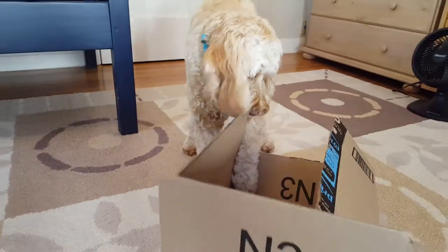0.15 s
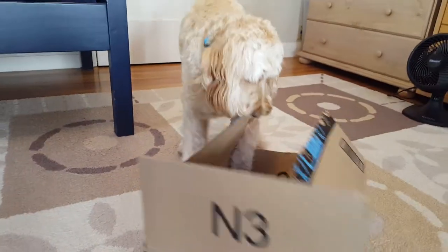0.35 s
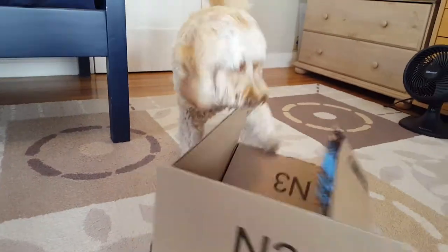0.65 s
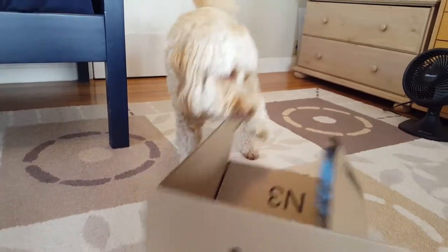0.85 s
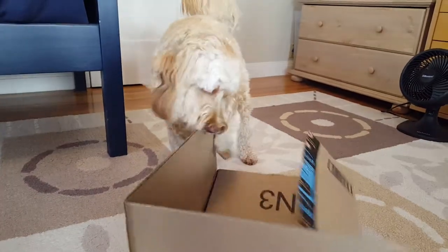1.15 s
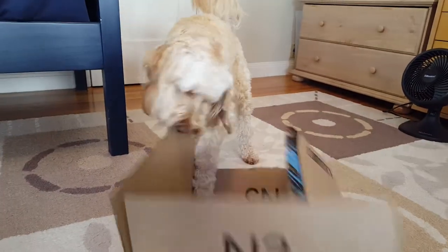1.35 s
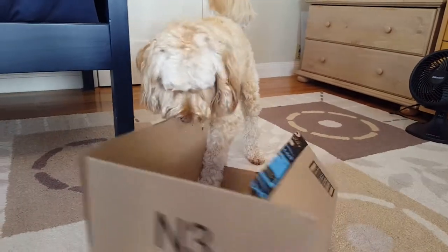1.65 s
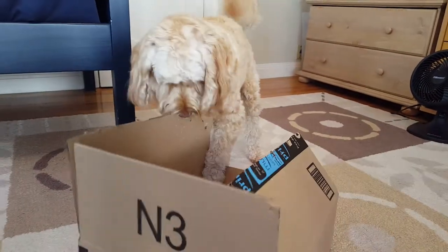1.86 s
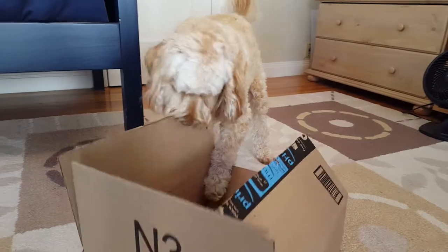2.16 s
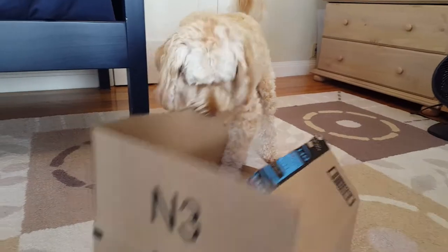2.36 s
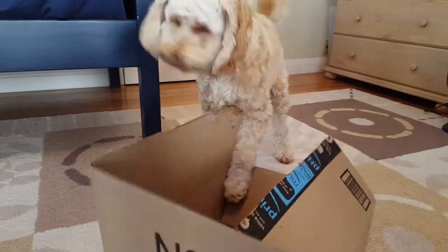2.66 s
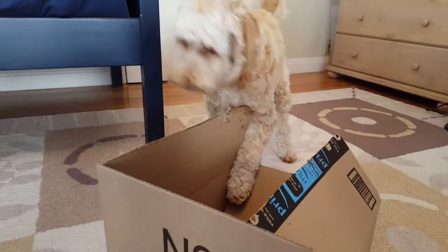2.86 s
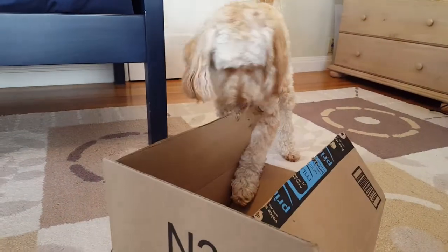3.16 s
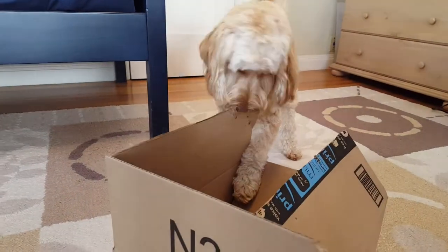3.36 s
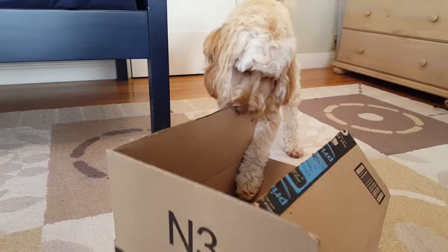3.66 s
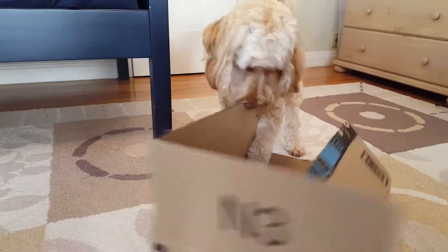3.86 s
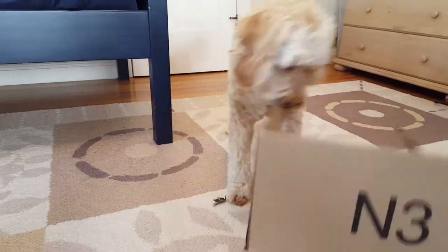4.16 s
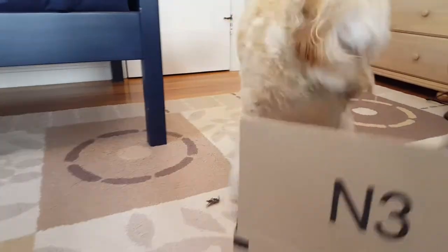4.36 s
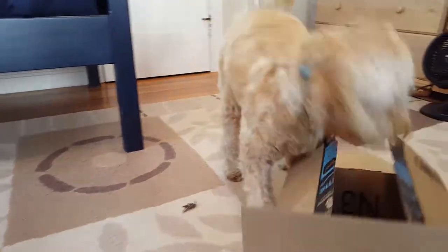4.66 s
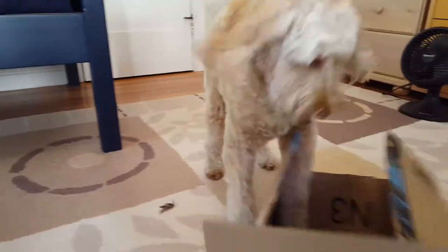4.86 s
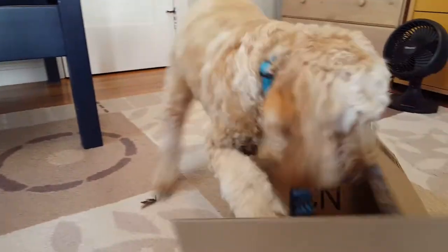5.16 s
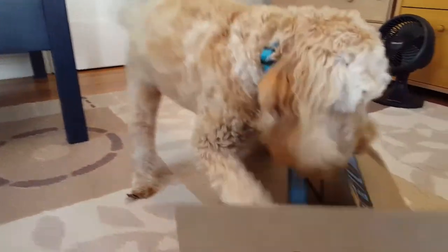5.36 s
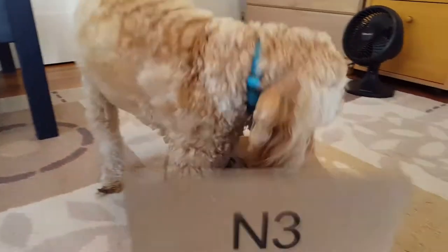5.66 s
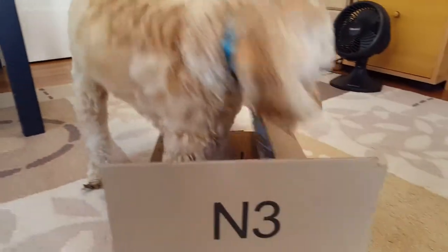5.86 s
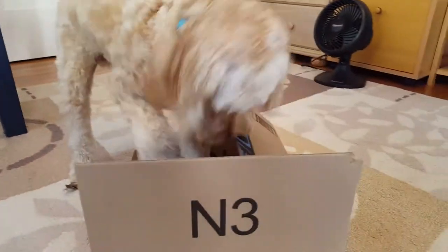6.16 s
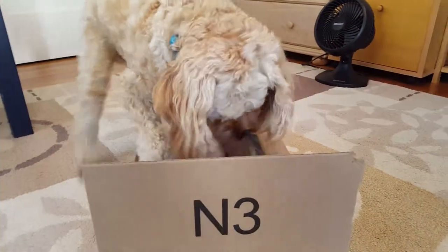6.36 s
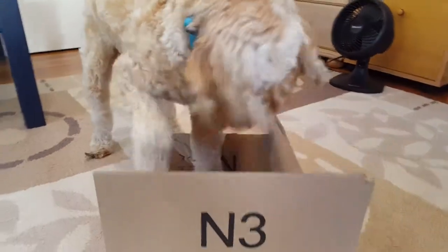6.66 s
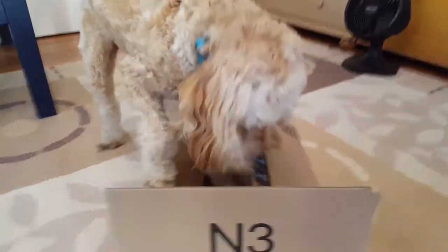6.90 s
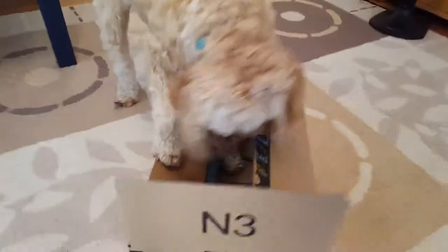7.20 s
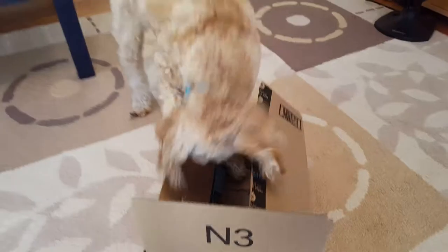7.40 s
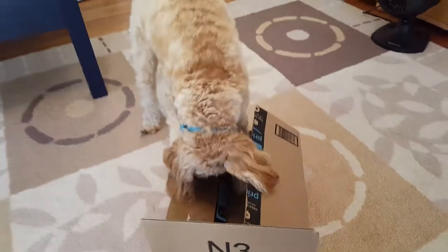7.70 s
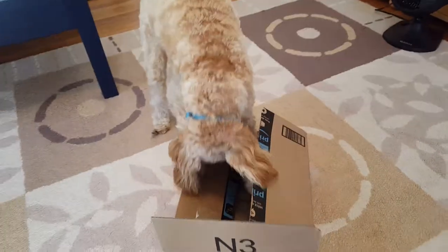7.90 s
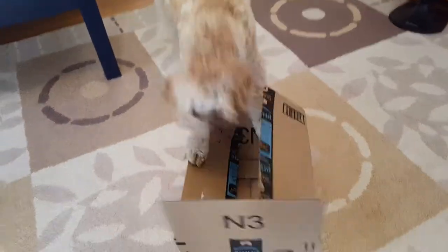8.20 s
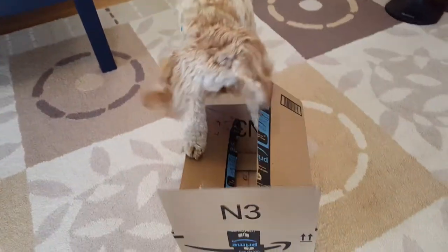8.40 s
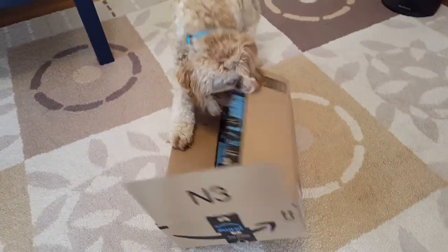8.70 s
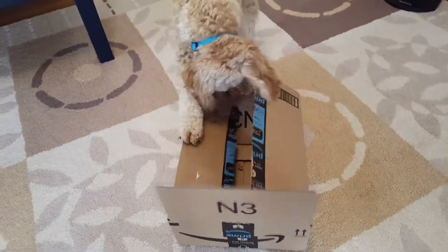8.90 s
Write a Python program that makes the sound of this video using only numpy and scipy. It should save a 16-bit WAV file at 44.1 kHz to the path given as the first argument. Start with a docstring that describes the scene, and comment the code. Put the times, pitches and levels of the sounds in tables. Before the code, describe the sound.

Close up in a furnished room, a puppy works at an open cardboard box on a rug. Light scuffs, rustles and small claw ticks come first, with occasional soft knocks. Then a dense flurry of hollow panel booms, sharp flap slaps, snapping fibres and a short rising rip, followed by quieter rubbing and one later double thump.

```python
"""Puppy with a cardboard box

A puppy paws, chews and drags an open cardboard box over a rug, close by in a furnished room.
Big panels boom and flaps slap as decaying modes; fibres snap, and rip, as filtered noise bursts and jerks;
teeth and claws click as short sine rings. Card rubs on fur and rug in uneven strokes of stick-slip noise,
which also set the panels rumbling. Faint steady air noise lies beneath."""
import sys
import numpy as np
from scipy import signal
from scipy.fft import rfft, irfft, next_fast_len
from scipy.io import wavfile
from scipy.ndimage import uniform_filter1d, map_coordinates

SR = 44100
rng = np.random.default_rng(int(sys.argv[2]) if len(sys.argv) > 2 else 0)


def materialize(psi):
    """Save the field psi as 16-bit PCM at rate SR to the path in sys.argv[1].

    A 1-D psi becomes a single channel; in a 2-D psi each row is a channel.
    """
    bounded = np.clip(np.atleast_2d(psi).T, -1, 1)
    quanta = np.round(bounded * 32767).astype(np.int16)
    wavfile.write(sys.argv[1], SR, quanta)


N = 398660  # length in samples

# modes of the big panels and the air between them: f/Hz, relative level/dB, t60/s
PANEL_MODES = [(73, -14, 0.16), (101, -12, 0.09), (118, -6, 0.088), (147.8, -3, 0.11), (172.6, -1, 0.078),
               (218.6, -4.5, 0.18), (254.7, -7.5, 0.27), (322, -7, 0.42), (374, 0.5, 0.38),
               (468.6, -1.5, 0.18), (550, -27, 0.04)]


def amp(db):
    """Level to gain: 20 dB is a factor of ten in amplitude."""
    return 10 ** (np.asarray(db) / 20)


def unit(x):
    """Normalisation to a root-mean-square of 1."""
    return x / np.sqrt(np.mean(x ** 2) + 1e-20)


def along(points, hz):
    """Interpolation of (f/Hz, value) points on a logarithmic frequency axis."""
    f, v = np.transpose(points)
    return np.interp(np.log(hz + 1), np.log(f + 1), v)


def curves(rows):
    """Linear interpolation in time: one value per sample for each column after the time."""
    s, *cols = np.transpose(rows)
    return [np.interp(np.arange(N) / SR, s, c) for c in cols]


def wobble(rate):
    """Band-limited fluctuation: a smooth curve through rate random knots a second."""
    knots = rng.standard_normal(int(N * rate / SR) + 4)
    return map_coordinates(knots, [np.arange(N) * rate / SR])


def filtered(x, response):
    """Linear filtering: the spectrum of x times a function of frequency."""
    n = x.shape[-1]
    padded = next_fast_len(n + 4096)
    spectrum = rfft(x, padded) * response(np.fft.rfftfreq(padded, 1 / SR))
    return irfft(spectrum, padded)[..., :n]


def coloured(x, spectrum):
    """Spectral shaping by (f/Hz, level/dB) points."""
    return filtered(x, lambda hz: amp(along(spectrum, hz)))


def bell(hz, centre_hz, octaves):
    """Resonance curve: gain falls away on both sides of a centre, to half at the given octaves."""
    return 1 / (1 + (np.log2((hz + 1) / centre_hz) / octaves) ** 2)


def ring(modes, t, centre_hz, octaves, bend, scatter_db):
    """Modal superposition: a blow excites modes near a centre; bending detunes bent card at each blow."""
    hz, db, t60 = np.transpose(modes)
    detune, strength = rng.standard_normal((2, len(hz)))
    gain = amp(db + scatter_db * strength) * bell(hz, centre_hz, octaves)
    tuned_hz = hz * (1 + bend * detune)
    vibration = np.sin(2 * np.pi * np.outer(tuned_hz, t)) * amp(-60 * t / t60[:, None])
    return gain @ vibration


def thumps():
    """Impact on a panel: a soft paw pushes it in, and the low modes of the box boom."""
    # t/s, level/dB (rms of the loudest 256 samples, before panning), centre of the boom f/Hz
    thump_events = [(0.641, -23.5, 175), (0.92, -40.5, 68), (1.172, -39.5, 193), (1.264, -32, 216),
                    (2.033, -33, 207), (2.158, -39, 239), (2.448, -25, 206), (2.735, -20, 222),
                    (3.15, -53.5, 278), (3.503, -34, 312), (3.652, -35.5, 200), (3.859, -43, 282),
                    (4.158, -34, 183), (4.332, -26, 129), (4.444, -15.5, 136), (4.497, -21.5, 159),
                    (4.558, -14.5, 231), (4.794, -27, 212), (4.925, -29.5, 236), (5.118, -15.5, 161.6),
                    (5.297, -18.5, 179), (5.385, -17.5, 134), (5.507, -25, 101), (5.696, -7, 167.4),
                    (5.74, -12, 201), (5.843, -21.5, 206), (7.76, -35, 260), (8.038, -13.5, 214),
                    (8.05, -19.5, 106), (8.06, -16.5, 215), (8.903, -21.5, 157), (8.992, -28, 157)]
    out, t = np.zeros((2, N)), np.arange(SR // 2) / SR
    for s, db, hz in thump_events:
        boom = ring(PANEL_MODES, t, hz, octaves=0.21, bend=0.0066, scatter_db=12.0)
        boom = boom * (1 - np.exp(-t / 0.0033))
        # the paw stays on the panel and damps it
        boom = boom * amp(-60 * t / 0.3)
        # the microphone passes little deep bass
        boom = signal.lfilter(*signal.butter(3, 70, "highpass", fs=SR), boom)
        boom = in_room(boom, wet_db=-7.0, near_db=-3.5, near_t60=0.066, ceiling_db=-18.5)
        add(out, s, boom, db, pan_db=1.5, size=256)
    return out


def knocks():
    """Impact on a stiff flap: clear modes, a papery crowd of others and a crack; slow contact rounds the attack."""
    # flaps slapping and jaws knocking: t/s, level/dB (rms of the loudest 128 samples, before panning),
    # centre f/Hz, crack level re the knock/dB, time constant of contact/s
    knock_events = [(0.476, -34.5, 780, -27, .006), (0.614, -34.5, 795, -20, 0.0079),
                    (1.270, -20, 860, -16, 0.0013), (2.023, -37, 850, -17, 0.017),
                    (2.437, -25, 730, -9, 0.0014), (2.555, -30.5, 744, -21, 0.0032),
                    (2.635, -30.5, 980, -22, .005), (2.734, -25.5, 510, -18, 0.0009),
                    (3.504, -37, 1580, -11, 0.0024), (3.650, -36, 820, -18, .003),
                    (4.152, -33, 716, -30, 0.0008), (4.462, -15.5, 1000, -30, 0.0042),
                    (4.556, -27, 533, -19, 0.0021), (4.612, -22.5, 520, -6, 0.006),
                    (4.798, -30.5, 890, -18, 0.0019), (4.926, -31, 1050, -33, 0.011),
                    (4.979, -25, 1140, -9, 0.0072), (5.115, -16.5, 1130, -11, 0.00031),
                    (5.126, -13, 924, -11, 0.00031), (5.253, -28, 1170, -22, 0.0018),
                    (5.296, -28, 606, -30, 0.00072), (5.348, -18.5, 1230, -8, .002),
                    (5.385, -13, 630, -30, 0.0034), (5.397, -16.5, 870, -20, 0.00053),
                    (5.504, -16.5, 1500, -17, 0.00022), (5.660, -20.5, 734, -2, 0.0004),
                    (5.696, -11.5, 563, -21, 0.00075), (5.738, -29, 400, -28, 0.0017),
                    (5.845, -31.5, 680, -8, .0007), (5.883, -10.5, 740, -26, 0.00024),
                    (5.900, -40, 784, -36, 0.00035), (6.283, -20, 1420, -46, 0.00035),
                    (6.698, -27.5, 1100, -7, 0.0012), (7.305, -45, 830, -30, .004),
                    (7.446, -34, 970, -26, 0.00069), (7.459, -34.5, 930, -29, 0.0017),
                    (8.031, -24.5, 810, -20, 0.0011), (8.043, -18.5, 604, -14, 0.0022)]
    # modes of a flap: f/Hz, relative level/dB, t60/s
    flap_modes = [(487, -2, 0.02), (694, -16.5, 0.051), (786.4, -9.5, 0.05), (890.5, 2.5, 0.016),
                  (1247, -3, 0.013), (1440, 0, 0.012), (2034, 2, 0.014), (2420, -9, 0.0093),
                  (3490, -1, 0.01)]
    out, t = np.zeros((2, N)), np.arange(SR * 2 // 5) / SR
    for s, db, hz, crack_db, contact_s in knock_events:
        clack = ring(flap_modes, t, hz, octaves=0.45, bend=0.024, scatter_db=2.5)
        crowd = filtered(rng.standard_normal(len(t)), lambda f: bell(f, 0.83 * hz, octaves=1.0) * (f > .7 * hz))
        crowd = unit(crowd) * amp(-60 * t / 0.037)
        body = clack / np.abs(clack).max() + amp(-14.5) * crowd
        # soft card swallows what lies far above the centre of the blow
        body = signal.lfilter(*signal.butter(3, 2.4 * hz, fs=SR), body)
        hit = body + amp(crack_db) * crack(t, t60=0.014)
        hit = hit * (1 - np.exp(-t / contact_s))
        hit = in_room(hit, wet_db=-2.5, near_db=-5.5, near_t60=0.017, ceiling_db=-13.5)
        add(out, s, hit, db, pan_db=1.5, size=128)  # the box stands a little to the left
    return out


def crack(t, t60):
    """Brittle fracture: breaking fibres give a coloured noise burst, peak 1."""
    # treble colour of a breaking fibre as the microphone hears it: f/Hz, relative level/dB
    crack_colour = [(500, -32), (1500, 6), (3500, 3), (7000, -2.5), (8700, 4.5), (10300, -8), (13000, 2),
                    (16000, -6.5)]
    burst = coloured(rng.standard_normal(len(t)) * amp(-60 * t / t60), crack_colour)
    return burst / np.abs(burst).max()


def snaps():
    """Sudden release of tension: fibres and tape give way with dry ticks."""
    # t/s, level/dB (rms of the loudest 96 samples, before panning), centre f/Hz, left-right level/dB
    snap_events = [(0.2736, -35.5, 4300, -3), (2.035, -58, 2700, 4), (2.7315, -38.5, 8100, -2),
                   (3.503, -32, 12600, 3), (4.189, -29.5, 4800, 0), (4.9766, -30, 8300, 8),
                   (5.1233, -42.5, 2630, -4), (5.2306, -30, 2920, 6), (5.3136, -21.5, 2650, 6),
                   (5.502, -24, 3000, -4), (5.7672, -28.5, 8200, 3), (5.848, -66, 2560, -4),
                   (6.2845, -32, 2470, 1.5), (7.7665, -38, 2630, 3), (8.294, -39.5, 5000, 2),
                   (8.899, -36.5, 5070, 5), (8.99, -41, 2940, 11)]
    out, t = np.zeros((2, N)), np.arange(SR * 2 // 5) / SR
    for s, db, hz, pan_db in snap_events:
        tick = filtered(crack(t, t60=0.0063), lambda f: bell(f, hz, octaves=1.7))
        tick = in_room(tick, wet_db=-4.5, near_db=-0.5, near_t60=0.076, ceiling_db=-13)
        add(out, s, tick, db, pan_db, size=96)
    return out


def clicks():
    """Hard impact: a tooth or claw rings as a sine for a few milliseconds, with a crack."""
    # t/s, level/dB (rms of the loudest 96 samples, before panning), ring f/Hz
    click_events = [(0.276, -34, 4340), (0.735, -41.5, 5600), (3.894, -44, 2900), (3.933, -46, 2780),
                    (4.1893, -42, 2960), (8.3944, -35.5, 2880)]
    out, t = np.zeros((2, N)), np.arange(SR // 4) / SR
    for s, db, hz in click_events:
        ping = np.sin(2 * np.pi * hz * t) * amp(-60 * t / 0.013)
        ping = ping + 0.98 * crack(t, t60=.008)
        ping = in_room(ping, wet_db=-7, near_db=-6, near_t60=.025, ceiling_db=-29)
        add(out, s, ping, db, pan_db=-5, size=96)
    return out


def rip():
    """Progressive fracture: fibres break in a run, and their resonance climbs as the pull speeds up."""
    # one fast rip along the card: t/s, level/dB, resonance f/Hz
    rip_course = [(5.36, -110, 900), (5.385, -37, 990), (5.405, -23, 1190), (5.44, -24.5, 2090),
                  (5.475, -36, 3120), (5.52, -28, 3180), (5.62, -110, 3280)]
    level_db, centre_hz = curves(rip_course)
    fibres = slips(rate=600, spread_db=5, scatter_db=-2)
    hz, t, z = signal.stft(fibres, SR, nperseg=256)
    centre = np.interp(t, np.arange(N) / SR, centre_hz)
    resonance = bell(hz[:, None], centre, octaves=0.42)
    sound = signal.istft(z * resonance, SR, nperseg=256)[1][:, :N]
    return unit(sound) * amp(level_db)


def slips(rate, spread_db, scatter_db):
    """Stick-slip friction in stereo: rate tiny uneven jerks a second, plus diffuse noise for scattered sound."""
    chance, size, sign = rng.random(N), rng.standard_normal(N), rng.choice([-1, 1], N)
    jerks = (chance < rate / SR) * amp(spread_db * np.clip(size, -2, 2)) * sign
    return unit(jerks) + amp(scatter_db) * diffuse(rng.standard_normal((2, N)))


def push(start, rise, hold, release_db_per_s):
    """Envelope of one push as power, 0-1: it builds up, holds, and decays exponentially."""
    t = np.arange(N) / SR - start
    live = (t > 0) & (t < rise + hold + .5)
    power, t = np.zeros(N), t[live]
    release = amp(-release_db_per_s * np.maximum(t - rise - hold, 0))
    power[live] = (np.minimum(t / rise, 1) * release) ** 2
    return power


def friction():
    """Power addition of unrelated sounds: strokes join the light rustle in gains of rasp, hiss and sheen."""
    # strokes of card on card, fur and rug, levels before the grip varies them: start t/s, rise/s, hold/s,
    # coarse rasp level/dB, fine hiss level/dB, sheen of the top octave re the hiss/dB
    stroke_events = [(0.196, 0.095, 0.045, -46, -46.5, -9), (0.455, 0.13, 0.059, -51.5, -41, 2),
                     (0.844, .02, 0.052, -53.5, -52.5, 9), (0.927, 0.013, 0.0045, -70.5, -44, 10.5),
                     (1.013, .05, .14, -83, -53.5, 9), (1.235, .02, 0.07, -42.5, -41.5, 5),
                     (1.608, 0.028, 0.053, -47.5, -45.5, 9), (1.723, 0.056, 0.021, -45.5, -43.5, 10),
                     (2.022, 0.023, 0.0083, -45, -46, -1), (2.295, 0.083, 0.076, -47, -54, 13),
                     (2.426, 0.029, 0.081, -36, -37.5, 7), (2.624, 0.023, .005, -45, -41, -1.5),
                     (2.727, 0.0033, 0.011, -47, -61, 1), (3.407, 0.013, 0.097, -67, -64.5, 6),
                     (3.498, 0.013, .01, -42, -50, -2), (3.605, 0.036, 0.099, -45.5, -51, 7.5),
                     (3.922, 0.083, 0.079, -49.5, -51.5, -1), (4.145, 0.019, 0.2, -50, -56, 2),
                     (4.338, 0.029, .01, -40, -49, 4), (4.364, .022, .018, -29.5, -29.5, 2),
                     (4.42, 0.013, 0.071, -29.5, -38, 2), (4.519, 0.034, 0.021, -28.5, -28, 0.5),
                     (4.782, 0.02, 0.022, -35.5, -34, 2), (4.86, 0.014, 0.084, -40.5, -44.5, 3.5),
                     (4.969, 0.0071, 0.013, -35, -34, 6.5), (5.119, 0.0017, 0.013, -31.5, -25.5, 0),
                     (5.165, 0.018, 0.037, -40, -35.5, 2.5), (5.298, 0.005, 0.099, -33.5, -39.5, 9.5),
                     (5.39, 0.068, 0.021, -30, -22.5, 3), (5.508, 0.012, 0.048, -33.5, -38, -2),
                     (5.64, 0.021, .012, -29, -26.5, -9), (5.875, 0.017, .04, -33, -42.5, 5),
                     (5.992, 0.024, .01, -41.5, -44, 0), (6.28, 0.0024, 0.015, -37.5, -43, -15),
                     (6.406, 0.045, 0.12, -71, -61.5, 12), (6.526, 0.023, 0.052, -47, -52, -11),
                     (6.608, 0.036, 0.03, -49, -50, 6), (6.69, 0.012, 0.037, -42.5, -40.5, -21),
                     (6.852, 0.02, 0.034, -49.5, -49, 1), (6.991, 0.013, 0.012, -49.5, -51, -2),
                     (7.079, 0.065, 0.064, -55.5, -52.5, 3), (7.268, 0.042, 0.031, -49, -55, -3),
                     (7.443, 0.0038, 0.13, -49.5, -52, -2), (7.766, 0.0096, 0.023, -44.5, -54, 0),
                     (7.933, .01, 0.037, -42.5, -48.5, -3), (7.956, .05, .02, -47, -47.5, 8),
                     (8.022, 0.017, 0.035, -34.5, -42, 2), (8.143, 0.057, 0.04, -46, -51.5, 4),
                     (8.399, 0.0051, 0.019, -48, -53.5, 4), (8.544, 0.043, 0.08, -69, -44.5, 0.5),
                     (8.67, 0.017, 0.057, -46.5, -59.5, -6.5), (8.875, 0.011, 0.017, -48.5, -52.5, -3)]
    # rustle between strokes, as the puppy never quite keeps still: t/s, rasp level/dB
    fidget_course = [(0, -51.5), (0.42, -53), (0.8, -59.5), (1.52, -52.5), (1.93, -71), (2.2, -62.5),
                     (2.88, -61), (3.3, -74), (3.57, -61), (4.7, -48.5), (5.95, -53.5), (6.18, -67.5),
                     (6.42, -52.5), (7.4, -67.5), (7.58, -60.5), (8.1, -54.5), (8.45, -61), (9.04, -51.5)]
    fidget_db, = curves(fidget_course)
    rasp = amp(fidget_db) ** 2
    hiss = rasp * amp(-3) ** 2
    sheen = hiss * amp(2.5) ** 2
    for start, rise, hold, rasp_db, hiss_db, sheen_db in stroke_events:
        # the hiss dies faster than the rasp once the push stops
        rasp += amp(rasp_db) ** 2 * push(start, rise, hold, release_db_per_s=275)
        skin = amp(hiss_db) ** 2 * push(start, rise, hold, release_db_per_s=343)
        hiss += skin
        sheen += amp(sheen_db) ** 2 * skin
    return np.sqrt([rasp, hiss, sheen])


def flexing(pair, patchy_db):
    """Changing resonance: bending card shifts colour in patches about 170 Hz wide and 50 ms long; rms 1."""
    z = signal.stft(pair, nperseg=1024)[2]
    field = rng.standard_normal(z.shape[1:])
    for axis in (0, 1):
        field = uniform_filter1d(field, size=4, axis=axis)
    return unit(signal.istft(z * amp(patchy_db * unit(field)), nperseg=1024)[1][:, :N])


def rubbing(rasp_gain, hiss_gain, sheen_gain):
    """Stick-slip friction: coarse slips rasp in the flaps, fine ones hiss on the paper skin, under one grip."""
    # colours of rasp and hiss: f/Hz, relative level/dB
    rasp_colour, hiss_colour = [(250, -29), (450, -10), (620, -4), (760, 1.5), (900, 1.5), (1100, -3.5),
                                (1600, -4.5), (2300, -8.5), (3000, -12.5), (4500, -21), (9000, -67)], [(1200, -7.5), (2200, 2), (3100, -1), (4200, -1.5), (5800, 1),
                                              (7300, -2), (8600, 0), (10300, -11), (12800, -4),
                                              (16000, -8.5)]
    grip = wobble(70)
    coarse = slips(rate=380, spread_db=5.5, scatter_db=4.5)
    fine = slips(rate=1300, spread_db=5.5, scatter_db=5.5)
    rasp = flexing(coloured(coarse, rasp_colour), patchy_db=3.5) * rasp_gain * amp(1.63 * grip)
    hiss = flexing(coloured(fine, hiss_colour), patchy_db=2.5)
    # the top octave, above about 9.5 kHz, has a gain of its own
    sheen = filtered(hiss, lambda hz: 1 / (1 + (9500 / (hz + 1)) ** 8))
    hiss = ((hiss - sheen) * hiss_gain + sheen * sheen_gain) * amp(1.41 * grip)
    # both lean about 1 dB to the left
    rasp = lingering(rasp, wet_db=-2.5) * amp([[.6], [-.6]])
    return rasp + lingering(hiss, wet_db=-12) * amp([[.5], [-.5]])


def shudder(rasp_gain):
    """Forced vibration: the box judders over the rug; strokes, and more so shoves, make its panels rumble."""
    # shoves that slide the whole box, levels before wobble and room: start t/s, hold/s, rumble level/dB
    shove_events = [(0.609, 0.059, -36), (0.919, 0.023, -41.5), (1.632, .05, -42.5), (2.452, 0.18, -35.5),
                    (2.734, 0.059, -41.5), (3.41, .06, -54), (3.638, 0.085, -42.5), (4.147, 0.027, -35.5),
                    (4.402, 0.16, -26.5), (4.795, 0.26, -55), (5.123, .14, -38.5), (5.29, 0.19, -28.5),
                    (5.655, 0.081, -20), (5.884, 0.028, -30), (7.763, 0.29, -47), (8.034, 0.041, -26),
                    (8.14, 0.2, -44), (8.73, 0.26, -47.5)]
    # colour of the rumble: f/Hz, relative level/dB
    rumble_colour = [(25, -39), (60, -4), (110, -1.5), (165, 1), (240, 5), (310, 3), (380, 4), (480, -5.5),
                     (650, -8), (1000, -13), (2000, -98)]
    power = (amp(-1) * rasp_gain) ** 2
    for start, hold, db in shove_events:
        power += amp(db) ** 2 * push(start, 0.012, hold, release_db_per_s=275)
    rumble = coloured(slips(rate=160, spread_db=2.5, scatter_db=-1.5), rumble_colour)
    rumble = resonant(rumble, PANEL_MODES, lift_db=-6.0)
    rumble = unit(rumble) * np.sqrt(power) * amp(2.8 * wobble(25))
    return lingering(rumble, wet_db=-4.0) * amp([[.4], [-.4]])


def resonant(x, modes, lift_db):
    """Resonance: x is lifted around the modes of the card; a faster decay makes a broader peak."""
    hz, db, t60 = np.transpose(modes)
    half_width = np.log(1000) / (np.pi * t60)
    grid = np.arange(SR // 8)  # Hz
    peaks = amp(db) @ (1 / (1 + ((grid - hz[:, None]) / half_width[:, None]) ** 2))
    return filtered(x, lambda f: 1 + amp(lift_db) * np.interp(f, grid, peaks))


def diffuse(pair):
    """Diffuse-field coherence: two unrelated signals become left and right, alike in bass but not in treble."""
    # likeness of left and right for sound from all around: f/Hz, correlation (0-1)
    likeness = [(100, 0.94), (250, 0.89), (500, 0.73), (1000, 0.4), (2000, 0), (12000, 0)]
    turn = lambda hz: np.arccos(np.clip(along(likeness, hz), -1, 1)) / 2
    mid, side = filtered(pair, lambda hz: np.array([np.cos(turn(hz)), np.sin(turn(hz))]))
    return np.array([mid + side, mid - side])


def room_tail():
    """Reverberation: the room answers a click with stereo noise whose decay depends on frequency."""
    # decay of the room: f/Hz, t60/s
    room_decay = [(80, 0.53), (250, 0.45), (1000, 0.28), (4000, 0.42), (14000, 0.4)]
    hz, t, z = signal.stft(rng.standard_normal((2, SR // 2)), SR, nperseg=256)
    decay = amp(-60 * t / along(room_decay, hz)[:, None])
    tail = signal.istft(z * decay, SR, nperseg=256)[1]
    tail = tail * (1 - np.exp(-np.arange(tail.shape[1]) / SR / 0.0016))
    return diffuse(tail / np.linalg.norm(tail[0]))


def in_room(x, wet_db, near_db, near_t60, ceiling_db):
    """Impulse response of a hit: direct sound, a flurry of echoes from box and floor, the ceiling, the tail."""
    tail = room_tail()
    t = np.arange(tail.shape[1]) / SR
    near = rng.standard_normal(tail.shape) * amp(-60 * t / near_t60) * (1 - np.exp(-t / 0.00036))
    echo = amp(wet_db) * tail + amp(near_db) * diffuse(near / np.linalg.norm(near[0]))
    echo[:, 0] += 1
    echo[:, round(.0185 * SR)] += amp(ceiling_db)  # ceiling delay in s
    return signal.fftconvolve(x[None], echo, axes=1)[:, :len(x)]


def lingering(pair, wet_db):
    """Reverberation by convolution: a sustained stereo sound with the room's tail behind it."""
    return pair + amp(wet_db) * signal.fftconvolve(pair, room_tail(), axes=1)[:, :N]


def add(track, s, sound, db, pan_db, size):
    """Superposition: a stereo sound joins at s seconds, its loudest size samples set to db, then panned."""
    loudest = np.sqrt(uniform_filter1d(np.mean(sound ** 2, axis=0), size).max())
    part = track[:, round(s * SR):][:, :sound.shape[1]]
    gain = amp(db + np.array([[pan_db], [-pan_db]]) / 2)
    part += sound[:, :part.shape[1]] / loudest * gain


def quiet():
    """Stationary diffuse noise: the faint steady air of the room."""
    # colour of the quiet room: f/Hz, relative level/dB
    air_colour = [(25, 2), (60, 6.5), (120, 2), (250, -21), (400, -35.5), (900, -29), (2000, -17),
                  (6000, -26), (16000, -36)]
    air = diffuse(rng.standard_normal((2, N)))
    return amp(-66.5) * unit(coloured(air, air_colour))


def scene():
    """Superposition of everything the box does, over the still room."""
    rasp, hiss, sheen = friction()
    hits = thumps() + knocks() + snaps() + clicks()
    return hits + rip() + rubbing(rasp, hiss, sheen) + shudder(rasp) + quiet()


def record(dry):
    """Level and time differences between two microphone ports; peaks saturate and the band ends steeply."""
    lean_db = [(1000, 0), (2200, 0.5), (4200, -3.5), (7500, -2.5), (12000, 2.5)]  # f/Hz, left-right level/dB
    left_lead_s, top_hz = .00003, 16100
    ports = np.array([[.5], [-.5]])
    level = lambda hz: amp(ports * along(lean_db, hz))
    arrival = lambda hz: np.exp(2j * np.pi * hz * ports * left_lead_s)
    heard = filtered(dry, lambda hz: level(hz) * arrival(hz))
    heard = heard / (1 + np.abs(heard) ** 6) ** (1 / 6)
    return filtered(heard, lambda hz: hz < top_hz)


dry = scene()
out = record(dry)
materialize(out)
```